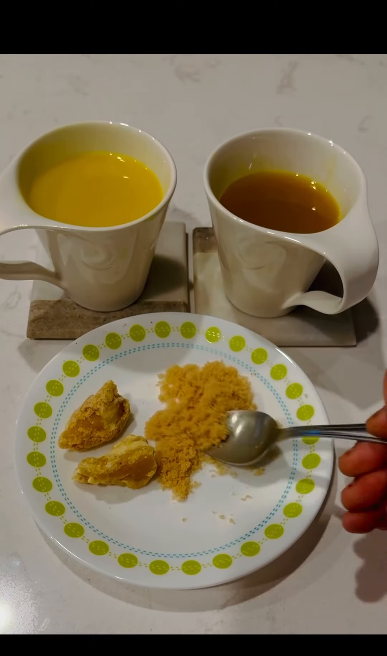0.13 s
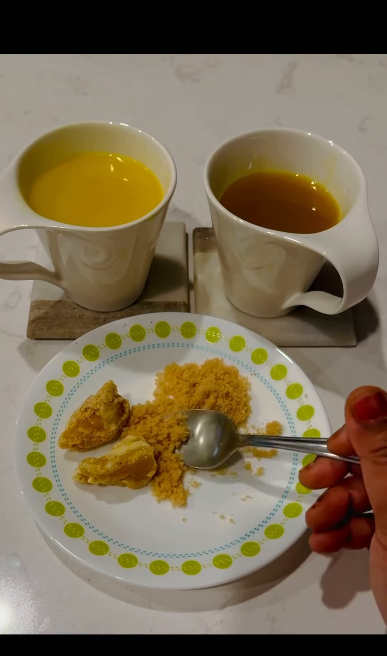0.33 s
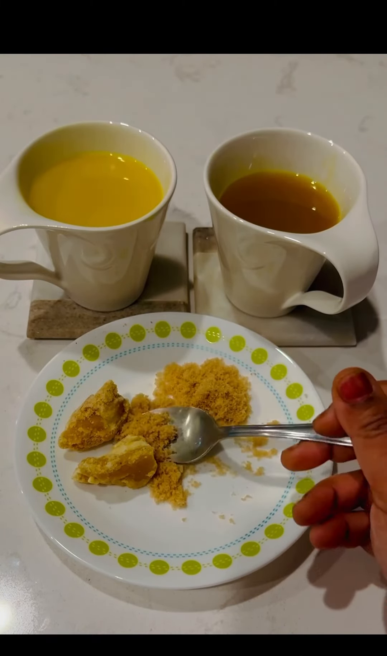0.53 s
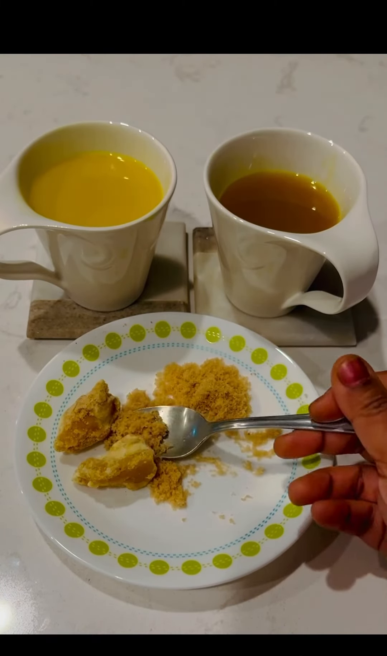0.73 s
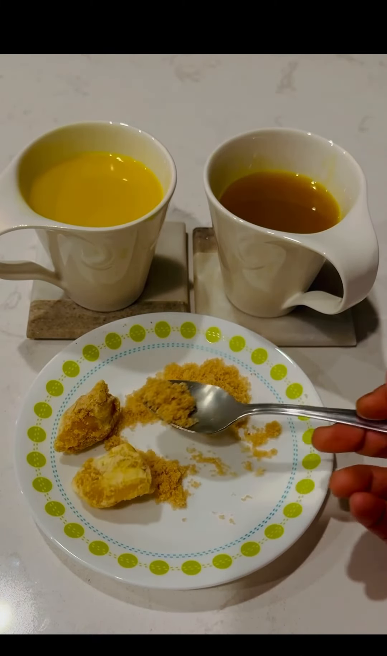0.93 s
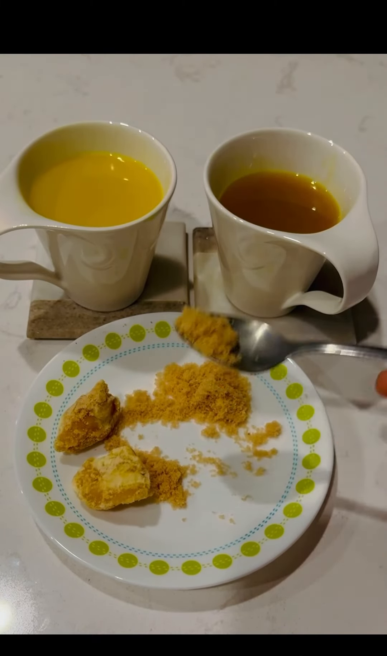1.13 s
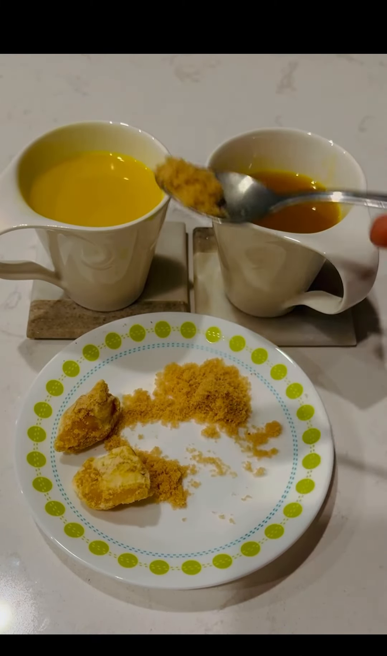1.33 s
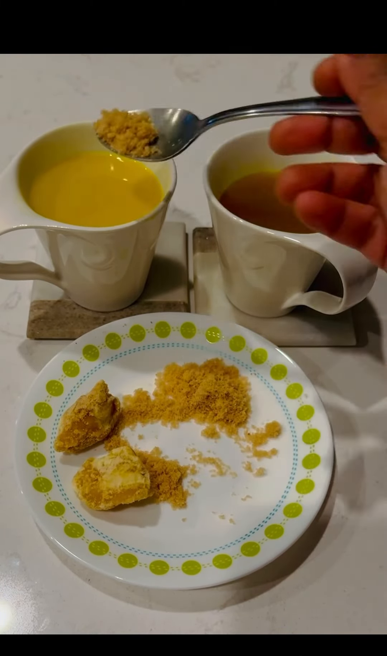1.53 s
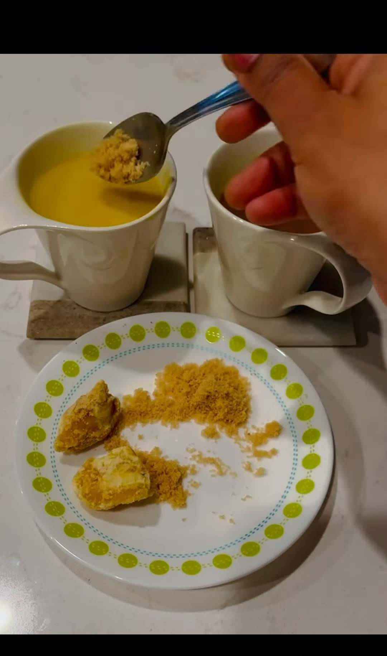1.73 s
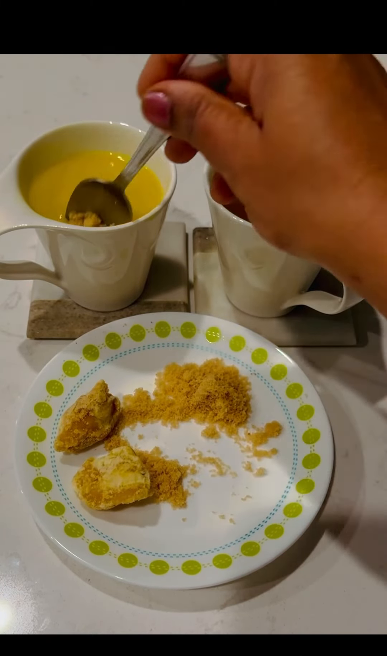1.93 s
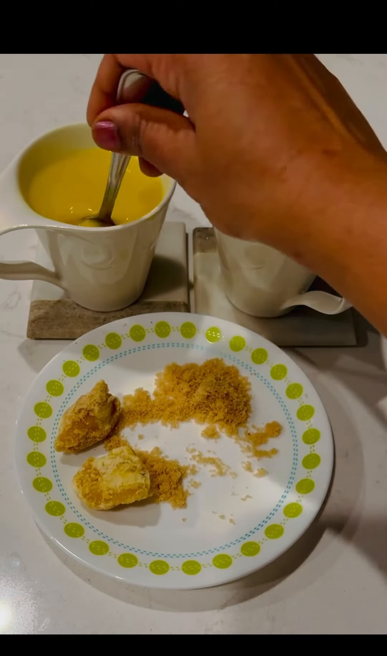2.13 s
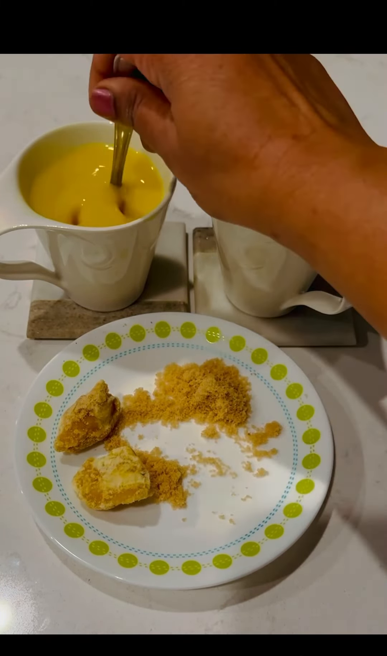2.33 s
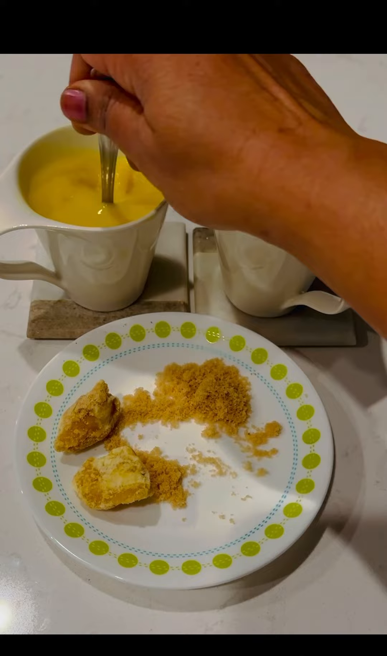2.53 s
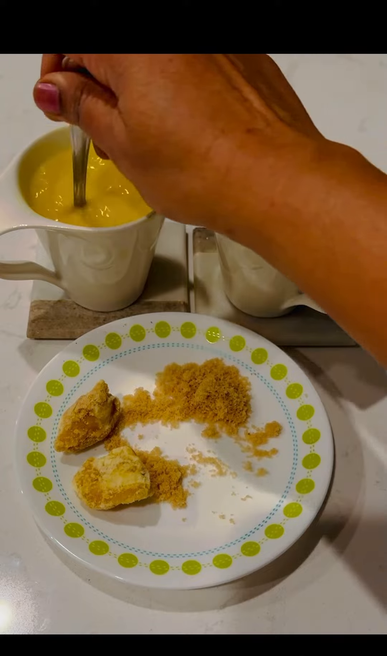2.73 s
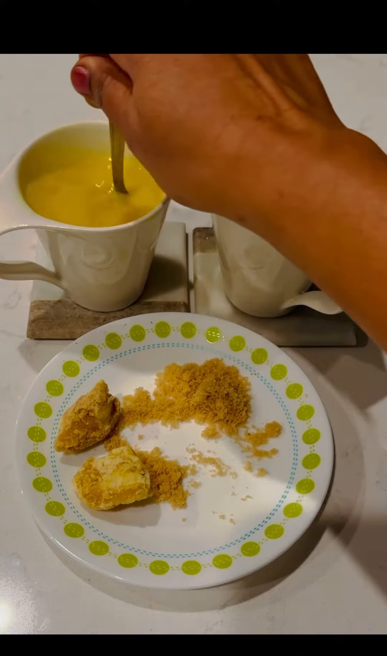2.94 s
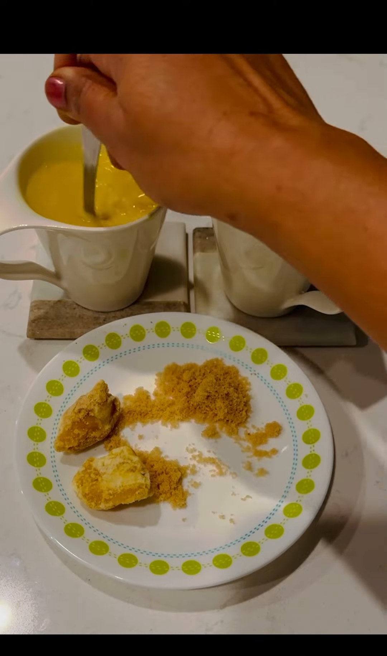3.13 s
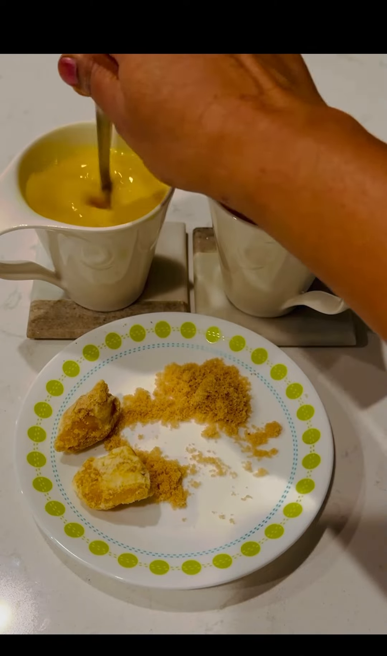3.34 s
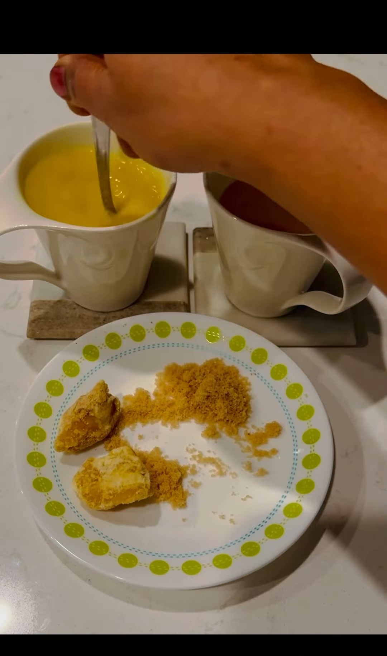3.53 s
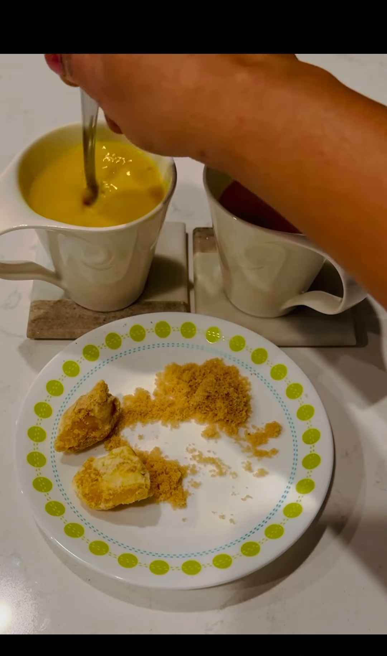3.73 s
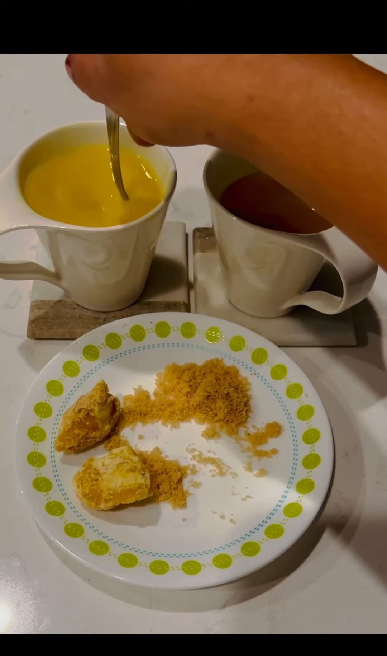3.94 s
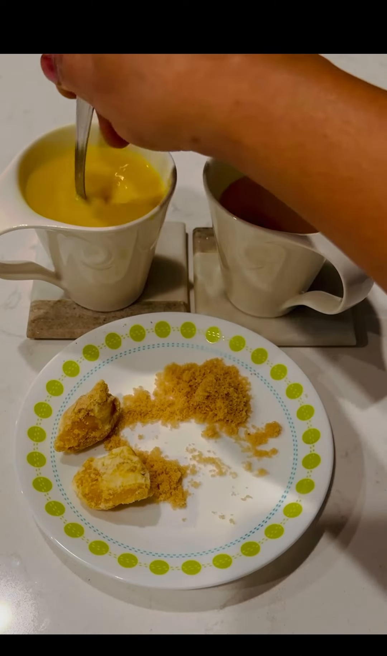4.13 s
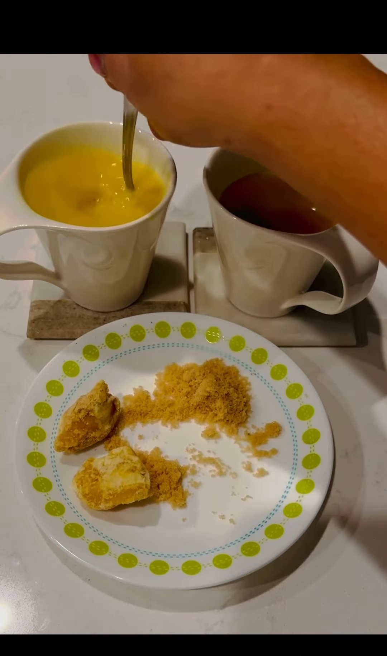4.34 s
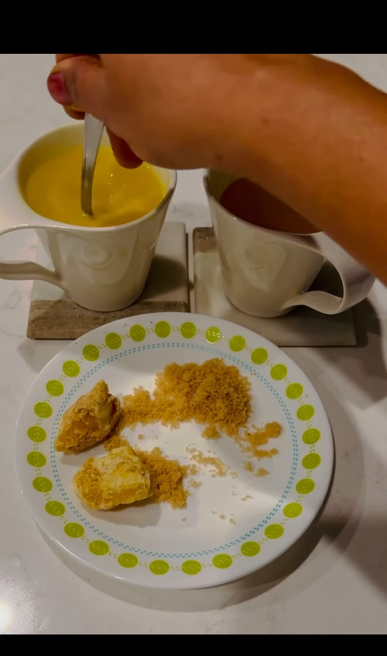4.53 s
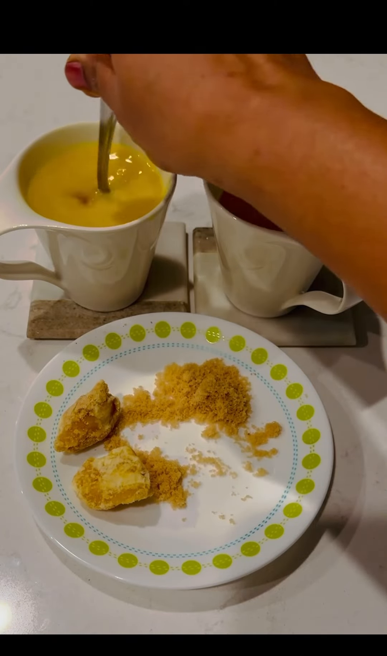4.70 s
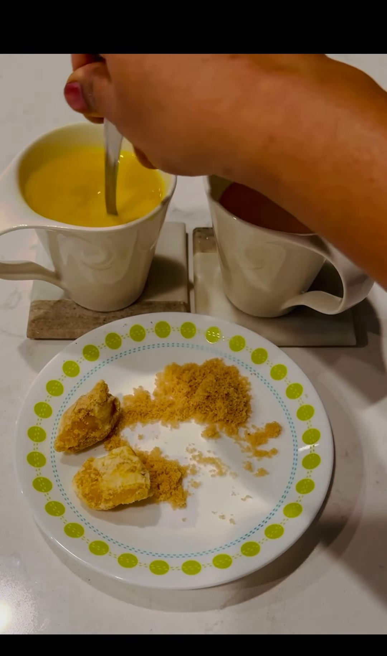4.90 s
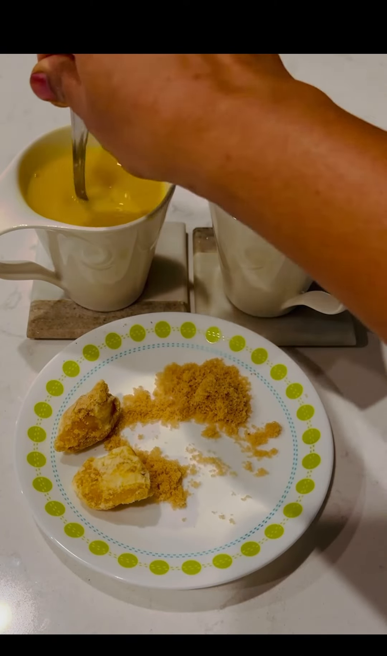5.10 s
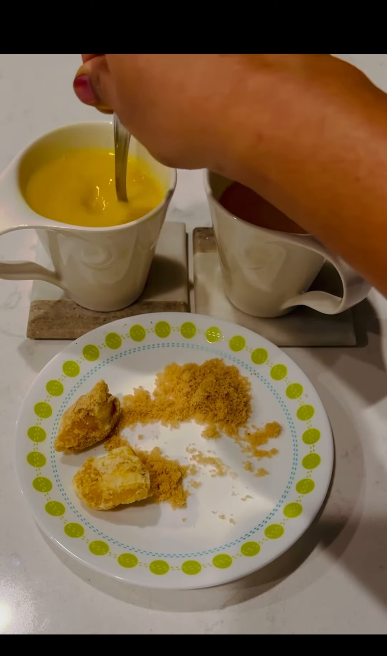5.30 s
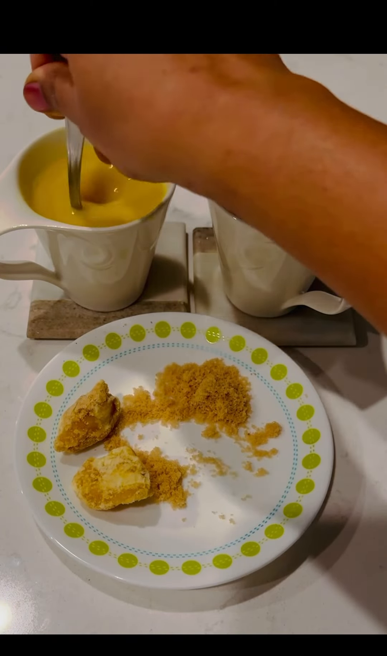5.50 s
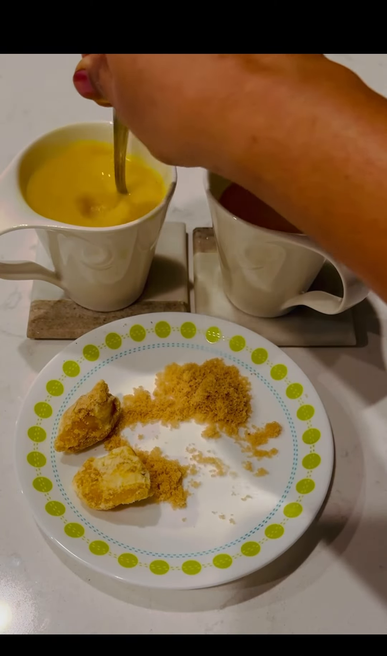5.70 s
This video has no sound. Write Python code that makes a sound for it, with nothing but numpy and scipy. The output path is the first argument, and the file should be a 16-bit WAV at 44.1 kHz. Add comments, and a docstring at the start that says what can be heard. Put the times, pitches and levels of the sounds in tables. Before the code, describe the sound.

Gritty spoon scraping and light taps on a plate, a near-silent gap, then bright, damped clinking and gurgling stirring in a full mug.

```python
"""A quiet kitchen: a steel spoon scrapes sugar crumbs off a plate, then stirs a full ceramic mug, knocking its wall.
Each knock is noise through resonances plus sine modes that ring on, drift and waver as the drink moves.
Swishes and crunches are random clicks through resonances; short damped sines blip in the stirred drink.
Hard walls answer with dying noise; appliance rumble and faint hiss lie underneath.
A phone hears it all through two ports, which differ in balance and phase."""
import sys
import numpy as np
from scipy import signal
from scipy.fft import rfft, irfft, next_fast_len
from scipy.io import wavfile
from scipy.ndimage import uniform_filter1d

SR = 44100
rng = np.random.default_rng(int(sys.argv[2]) if len(sys.argv) > 2 else 0)


def output_pcm(signal):
    """Save a mono or channel-first signal as 16-bit PCM at the path in sys.argv[1].

    Samples are clipped to [-1, 1] before scaling.
    """
    pcm = np.clip(np.atleast_2d(signal).T, -1, 1) * 32767
    wavfile.write(sys.argv[1], SR, np.round(pcm).astype(np.int16))


N = 254016

# mug modes, in groups that share a shape round the wall:
# (nominal pitch at the first clink [Hz], once the sugar has mixed in [Hz], relative level [dB], free t60 [s])
MUG_MODES = [
    [(1813, 1790, 1, 0.31)],
    [(1937, 1875, 1, 0.33)],
    [(4440, 4400, 0, 0.23)],
    [(5530, 5435, -3, 0.17)],
    [(5500, 5110, 2, 0.19)],
    [(8300, 8160, -10, 0.34), (8160, 8390, -14, 0.1)],
    [(9280, 9240, -4.5, 0.14), (9600, 11000, -13, 0.093)],
]
# steel on glaze: (centre [Hz], width [Hz], relative level [dB])
GLAZE_TICK = [(4345, 580, -4), (5500, 740, -1.5), (6550, 900, 0), (8090, 400, 4.5), (9230, 700, -0.5),
              (9970, 615, -1.5), (12050, 540, -8), (14650, 800, -9)]
# an edge-on knock: (centre [Hz], width [Hz], relative level [dB])
EDGE_KNOCK = [(2065, 258, 2), (2726, 196, -4), (3090, 278, -5)]


def mug():
    """Each contact damps the old ring and starts a new one; the pitches drift as the sugar mixes in."""
    # spoon meets mug: (time [s], knock [dB], tick [dB], brightness of the knock [0-1], ring [dB],
    # hardness [dB per octave], place on the wall [degrees], spoon ring [dB],
    # share of the free ring time left to the upper modes [ratio], share of the higher mode near 5 kHz [0-1])
    clinks = [(1.983, -45, -31.5, 0.32, -43.5, -20.5, 136, -86, 3.2, .5),
              (2.2597, -61, -46, 0.6, -68, -6, 96, -74, .95, .5),
              (2.266, -41.5, -35, 0.96, -45, -8, 96, -86, 0.82, 0.4),
              (2.278, -44.5, -39, 0.88, -50, -8, 115, -80, 1.7, 0.1),
              (2.5142, -51.5, -59.5, 0.97, -84, -8, 180, -90, .95, .5),
              (2.639, -47, -38, 0.75, -46.5, -7.5, 59, -35, 0.46, .2),
              (2.676, -47, -56, 0.78, -52, -6.5, 152, -58, 1.2, 0.6),
              (2.8178, -55, -54.5, 0.97, -66, 2, 150, -70, 0.2, 0.3),
              (2.861, -43, -39.5, 1, -54.5, -14, 100, -52, .78, 0.6),
              (2.8983, -43, -47.5, 0.92, -56, -9, 110, -52, 0.36, .5),
              (3.1294, -40.5, -28.5, 0.82, -47, -5, 78, -90, .61, 1),
              (3.139, -42, -71, 0.9, -46, -10, 15, -95, 1.2, 0.8),
              (3.202, -51, -69, 0.86, -52.5, -9, 83, -82, 1.3, 0.9),
              (3.3405, -43, -32.5, 0.91, -48.5, -2, 93, -40, 0.81, 1),
              (3.5621, -36.5, -40.5, 0.76, -64.5, 5, 57, -86, 0.58, 0.3),
              (3.634, -45.5, -43, 0.76, -64.5, 5, 57, -82, 0.55, 0.86),
              (3.794, -36, -28.5, 0.86, -45.5, 0, 160.5, -44.5, 0.75, 1),
              (3.8353, -46.5, -67, 0.7, -60.5, -1, 127, -77, 0.85, .7),
              (4.0185, -53, -49, 0.2, -63, -8, 63, -81, .94, 0.6),
              (4.0755, -60, -51, 0.9, -64, -10, 52, -60.5, 0.87, .5),
              (4.1025, -64, -52, 0.8, -63, -7, 94, -73, 2.3, 0.2),
              (4.1376, -46, -48, 0.96, -50, -11, 95, -63, 1.4, 0.75),
              (4.2039, -47, -48, 0.74, -67.5, 2, 57, -62.5, .72, 1),
              (4.279, -33.5, -25, 0.69, -42, -2.5, 22, -43, 1.06, 0),
              (4.343, -40.5, -47, 0.54, -52, -8, 42, -54, 2.2, 1),
              (4.4545, -39, -38, 0.84, -55.5, -4.5, 57, -45.5, 1.26, .25),
              (4.54, -48.5, -66, 0.9, -56, -7, 3.7, -62.5, 1.7, .9),
              (4.5932, -47.5, -48, 1, -47.5, -7.5, 157, -51, 0.84, 0.43),
              (4.822, -49, -53, 0.48, -53, -12.5, 2.3, -57.5, .66, 0),
              (4.91, -43, -75, 0.87, -51.5, -13, 112, -59.5, 2.1, 0.5),
              (4.982, -43, -42.5, 0.7, -60, 2, 58, -51.5, 0.95, 1),
              (5.0281, -52, -50, 0.93, -57.5, -4.5, 63.5, -90, 0.64, .8),
              (5.2323, -34, -27.5, 0.66, -46.5, -1, 29, -36, 0.88, 1),
              (5.304, -39, -44, 0.86, -59, -1.5, 94, -54, 1, 0.9),
              (5.359, -46.5, -57, 0.95, -53.5, -3, 150, -61, 1.8, 0.9),
              (5.395, -48, -64, 0.9, -72, -1, 160, -79, 1.2, .5),
              (5.441, -53, -55, 1, -62.5, -7, 75, -61.5, 2.5, .5),
              (5.492, -45.5, -42, 0.85, -65, 3.5, 56, -55, 0.69, 0.4),
              (5.514, -54, -47, 0.9, -64, -1, 58, -81, 1, 0.3),
              (5.683, -42, -37.5, 0.28, -50, -8, 26, -54, 0.78, 0.6),
              (5.687, -50, -46, 0.4, -41, -13, 83.5, -54, 1.8, 1)]
    # spoon ringing in the drink: columns as for the mug modes
    spoon_modes = [(6690, 6760, 5, 0.09), (5900, 3000, -5, 0.04)]
    # a flat knock through the drink: (centre [Hz], width [Hz], relative level [dB])
    flat_knock = [(699.5, 132, -5), (1152, 210, 6), (1714, 686, -0.5)]
    twin_fades_s, twin_late_t60 = 3.3, 0.14  # from this time on the upper of the two lowest modes dies fast [s, s]
    wash_db, wash_t60 = -20, .16  # many small modes blur into a hiss after each tick [dB re tick, s]

    hits, t = np.array(clinks), np.arange(N) / SR
    times, knock_db, tick_db, brightness, ring_db, hardness, place, spoon_db, upper_share, higher = hits.T
    last = np.searchsorted(times, t) - 1  # latest contact; -1 before the first
    since = abs(t - times[last])
    unmixed = np.exp(-np.clip(t - times[0], 0, None) / 1.1)
    first_flash = 1 + 0.98 * amp(-60 * since / 0.059)  # loud until the spoon and the drink take up the blow

    ring = np.zeros(N)
    levels = ring_levels(ring_db, hardness, place, higher) + [spoon_db]
    for group, group_db in zip(MUG_MODES + [spoon_modes], levels):
        for start_hz, end_hz, db, t60 in group:
            height = end_hz / 4400
            level_luck, pitch_luck = rng.standard_normal((2, len(hits)))
            lasts = t60 * (np.clip(upper_share, .2, 2) if end_hz > 3000 else np.ones(len(hits)))
            if group is MUG_MODES[1]:
                lasts = np.where(times < twin_fades_s, t60, twin_late_t60)
            struck = carried(times, amp(group_db + db + 0.9 * height * level_luck), lasts)
            decay = amp(-60 * since / lasts[last])
            size = struck[last] * decay * first_flash ** min(height, 1.5) * (last >= 0)
            # the spoon lands on a new spot and the drink sloshes: each ring is a little out of tune
            detune = 1 + 0.0023 * pitch_luck[last] + 0.0022 * height ** 2.3 * wobble(60)
            hz = (end_hz + (start_hz - end_hz) * unmixed) * detune
            onset = np.pad(uniform_filter1d(size, size=61), (30, 0))[:N]  # softened and slightly late
            # the higher the mode, the more the moving drink breaks up its ring
            breakup = amp(2.3 * height ** .9 * wobble(80))
            ring += onset * breakup * np.sin(2 * np.pi * np.cumsum(hz) / SR)

    knocks = split_blows(times, knock_db, brightness, 0.039, flat_knock, EDGE_KNOCK)
    touches = bursts(times, tick_db, 0.018)
    wash = bursts(times, tick_db + wash_db, wash_t60)
    return ring + knocks + body(touches + wash, GLAZE_TICK, steep=True)


def ring_levels(ring_db, hardness, place, higher):
    """Per blow and group of modes: force, a tilt for hardness, and how far the wall moves at the place struck."""
    # shape of each group round the wall: (waves [count], loudest place [degrees], level added there [dB])
    wall_shapes = [(2, 0, 7.5), (2, 45, 7.5), (3, 5.3, 16.8), (3, -16.2, 10.1), (3, -16.2, 10.1),
                   (4, -10.6, 24.4), (2, 13.8, 17.8)]
    node_leak = 0.019  # amplitude that a blow on a still line wakes

    lowest_hz = MUG_MODES[0][0][1]
    higher = np.clip(higher, .02, .98)
    pair_share = {3: higher, 4: 1 - higher}  # the two modes near 5 kHz split one blow's power
    levels = []
    for k, (group, (waves, loudest, db)) in enumerate(zip(MUG_MODES, wall_shapes)):
        tilt_db = hardness * np.log2(group[0][1] / lowest_hz)
        motion = abs(np.cos(waves * np.radians(place - loudest))) + node_leak
        share_db = 10 * np.log10(pair_share.get(k, 1))
        levels.append(ring_db + db + share_db + tilt_db + 20 * np.log10(motion))
    return levels


def carried(times, fresh, lasts):
    """Size of a mode after each contact: the new blow and what is left of the ring before."""
    carry = 0.47  # share of the old ring that survives a new contact
    size = list(fresh[:1])
    for gap, new, t60 in zip(np.diff(times), fresh[1:], lasts):
        size.append(np.hypot(new, carry * size[-1] * amp(-60 * gap / t60)))
    return np.array(size)


def blips():
    """Each pitched blip of the stirred drink is a damped sine with a soft start and a ragged level."""
    # (start [s], starting pitch [Hz], nominal level [dB], life [cycles]); the envelope peaks at half the life
    drink_blips = [(2.266, 2780, -49, 68), (2.375, 710, -64.5, 7.6), (2.516, 2330, -40, 7),
                   (2.865, 2640, -51, 25), (2.764, 3780, -49.5, 10), (2.975, 1396, -57, 15),
                   (3.345, 2616, -42, 18), (3.48, 704, -65, 7.6), (3.505, 688, -63, 7.5),
                   (3.833, 2155, -42.5, 12)]
    sag_per_s = 1.1  # the pitch sinks by this share a second
    out, t = np.zeros(N + SR), np.arange(SR // 10) / SR
    for s, hz, db, life in drink_blips:
        u = t * hz / life * 2
        envelope = np.e * u * np.exp(-u)
        out[round(s * SR):][:len(t)] += amp(db) * envelope * np.sin(2 * np.pi * hz * t * (1 - sag_per_s * t / 2))
    return out[:N] * amp(3.4 * wobble(300))


def swirl():
    """The spoon drags drink and sugar along the glaze in uneven, gurgling swishes."""
    # spoon dragging through the drink: (time [s], swish gain [dB], share made near the surface [0-1])
    drag = [(1.95, -79, 0.8), (2.6, -76.5, 0.06), (2.75, -63, 0.74), (2.84, -70, 0.8), (3, -62.5, 0.4),
            (3.11, -74, 0.1), (3.25, -60, 1), (3.45, -59.5, 0.2), (3.53, -67.5, 0.5), (3.59, -56, 0.6),
            (3.75, -63, 0.6), (3.88, -72, 0.6), (3.97, -55.5, 0.73), (4.07, -73, 0.73), (4.4, -60, 0.3),
            (4.7, -76, 0.02), (4.78, -70.5, 0.76), (4.93, -56, 0.5), (5.18, -72, 0.03), (5.27, -60.5, 0.04),
            (5.42, -62, 0), (5.62, -73, 0.17), (5.76, -54, 1)]
    # air above the drink, for deep and surface strokes: (centre [Hz], width [Hz], relative level [dB])
    deep_air = [(694, 670, -11.5), (1490, 380, 2)]
    shallow_air = [(2125, 430, -4), (3420, 400, -9.5)]

    def rub():
        return unit(grit(2500, 2.8) * amp(4.5 * wobble(35)))

    def hollow(peaks):
        return patchy(body(body(rub(), peaks), peaks), 7.5)  # the narrow mouth filters steeply

    s, _, share = np.transpose(drag)
    share = np.clip(np.interp(np.arange(N) / SR, s, share), 0, 1)
    shallow = hollow(shallow_air) + amp(-16.0) * hollow(EDGE_KNOCK[:1])
    shallow = shallow + amp(-9.0) * body(rub(), GLAZE_TICK) + amp(-10.5) * bubbles(count=400)
    # the rubbing keeps the lowest mode of the mug singing, 47 Hz wide
    song = unit(body(rub(), [(MUG_MODES[0][0][1], 47, 0)]))
    return curve(drag) * (np.sqrt(1 - share) * hollow(deep_air) + np.sqrt(share) * shallow + song)


def bubbles(count):
    """Tiny air pockets: very short sines with a soft start and a slightly rising pitch, rms 1."""
    start, pitch, size = rng.random((count, 3)).T
    t = np.arange(SR // 60) / SR
    hz = (1300 * 2.8 ** (pitch * pitch))[:, None]
    envelope = t * hz * np.exp(-t * hz / 3.5)
    pockets = amp(12 * size)[:, None] * np.sin(2 * np.pi * hz * t * (1 + 3 * t)) * envelope
    where = (start[:, None] * N).astype(int) + np.arange(len(t))
    return unit(np.bincount(where.ravel(), pockets.ravel(), minlength=N)[:N])


def plate():
    """Taps and crushed crumbs ring the plate low and the spoon high, and press on the counter."""
    # spoon on the plate: (time [s], low level [dB], high level [dB], nearness to the rim [0-1])
    plate_taps = [(0.032, -43.5, -39, 0.3), (0.053, -40, -47, 0.89), (0.058, -53, -56, 0.9),
                  (0.102, -61, -45, 0.9), (0.2365, -52.5, -61.5, 1), (0.259, -44.5, -52.5, 0.35),
                  (0.2758, -41.5, -55, 0.35), (0.2826, -48, -53, 0.5), (0.3165, -46, -65, 0.13),
                  (0.42, -54.5, -79, 0.03), (0.4708, -51.5, -46.5, 1), (0.512, -76, -59.5, 0.9),
                  (0.7087, -69.5, -71, 0.3), (0.9592, -63.5, -58, 0.22), (0.997, -71, -68, 0.15),
                  (1.0245, -68.5, -69, 0.3), (1.64, -78, -69, 0.1)]
    # resonances, all (centre [Hz], width [Hz], relative level [dB]):
    # middle of the plate, its rim, the spoon, the stone top under the plate
    plate_middle = [(2230, 420, 4.5), (2545, 180, -0.5)]
    plate_rim = [(2760, 240, 2), (3970, 165, 0.5), (4440, 224, -4), (5900, 360, -9.5)]
    spoon_steel = [(6220, 230, -6.5), (7070, 350, 2.5), (8580, 190, -0.5), (9870, 480, -1),
                   (13200, 530, -8), (14400, 1100, -15)]
    stone_top = [(593, 51, 7), (1270, 460, 1)]

    def crunch(clump_db):
        return unit(grit(2500, 2.55) * amp(clump_db * wobble(90.2)))

    s, low_db, high_db, rim = np.transpose(plate_taps)
    taps = split_blows(s, low_db, rim, 0.014, plate_middle, plate_rim)
    taps = taps + body(bursts(s, high_db, 0.023), spoon_steel)
    grains = crunch(clump_db=2.0)
    on_plate = body(grains, plate_middle, steep=True) + amp(-5.0) * body(grains, plate_rim, steep=True)
    crumbs = patchy(on_plate, 1.5) + amp(-10.0) * body(crunch(clump_db=-5.0), spoon_steel)
    return taps + pushes(column=1) * crumbs + pushes(column=2) * body(crunch(clump_db=4.0), stone_top)


def pushes(column):
    """Gain that swells to each push of the spoon into the crumbs and fades after it."""
    # (hardest moment [s], crunch gain [dB], press on the counter [dB])
    crumb_pushes = np.array([(.005, -61, -93), (.1, -60, -86), (.17, -65, -98), (.25, -59, -98),
                             (.3, -61, -70), (0.339, -62, -79), (0.431, -62.5, -76.5), (0.458, -59, -80),
                             (0.55, -55, -67.5), (0.574, -59.5, -68.5), (.65, -76, -80)])
    swell_db_per_s, fade_db_per_s = 362, 316
    late = np.arange(N) / SR - crumb_pushes[:, :1]
    slope_db = np.minimum(swell_db_per_s * late, -fade_db_per_s * late)
    return amp(crumb_pushes[:, column, None] + slope_db).sum(0)


def room(x):
    """Each frequency of the walls' answer dies at its own speed; each stretch of sound meets a fresh tail."""
    # decay of the walls' answer: (frequency [Hz], t60 [s])
    wall_decay = [(500, 0.69), (2000, 0.56), (6000, 0.57), (10000, 0.4), (15000, 0.12)]
    out, step = np.zeros((2, N + SR)), SR // 4
    for k in range(0, N, step):
        hz, t, z = signal.stft(rng.standard_normal((2, SR // 2)), SR, nperseg=256)
        fading = z * amp(-60 * t / along(wall_decay, hz)[:, None])
        tail = signal.istft(fading, SR, nperseg=256)[1]
        tail = tail + 0.91 * tail.mean(0)  # part of the tail reaches both ports alike
        wet = signal.fftconvolve(x[None, k:k + step], tail / np.linalg.norm(tail[0]), axes=1)
        out[:, k + 200:k + 200 + wet.shape[1]] += wet  # 200 samples behind the direct sound
    return out[:, :N]


def kitchen():
    """Low appliance rumble that wanders in lumps, over a faint hiss."""
    # slow course of the rumble: (time [s], relative level [dB])
    hum_course = [(0, -68.5), (1.3, -72.5), (2.2, -69.5), (3.2, -67.5), (4.3, -67.5), (5.76, -68)]
    # spectrum of the appliance rumble: (frequency [Hz], relative level [dB per Hz])
    rumble_spectrum = [(22, -28), (64, -1.5), (139, -6), (181, -6.5), (331, -14), (411, -18), (565, -20.5),
                       (635, -27.5), (1200, -32), (1900, -90)]
    # spectrum of the hiss: (frequency [Hz], relative level [dB per Hz])
    hiss_spectrum = [(500, -31), (1000, 0), (2200, 0), (3500, -6), (6500, -4.5), (7600, -11.5), (9000, -9),
                     (11300, -20), (14000, -6), (16500, -28)]
    lumps = amp(3.0 + 1.4 * wobble(4.73) + 1.7 * wobble(18))
    return curve(hum_course) * lumps * rush(rumble_spectrum) + amp(-84.5) * rush(hiss_spectrum)


def rush(spectrum):
    """Stereo noise of rms 1, its mid and side weighted for a set left-right likeness at each frequency."""
    # likeness of the two ports: (frequency [Hz], left-right correlation [-1 to 1])
    likeness = [(60, 0.94), (150, 0.96), (380, 0.79), (950, -0.18), (2380, 0.68), (5980, 0.48),
                (15000, -0.39)]

    def response(hz):
        turn = np.arccos(np.clip(along(likeness, hz), -1, 1)) / 2
        return amp(along(spectrum, hz)) * np.array([np.cos(turn), np.sin(turn)])

    mid, side = filtered(rng.standard_normal((2, N)), response)
    return unit(np.array([mid + side, mid - side]))


def split_blows(times, levels_db, share, t60, first, second):
    """Blows whose power is split between two sets of resonances."""
    share = np.clip(share, .02, .98)
    first_blows = bursts(times, levels_db + 10 * np.log10(1 - share), t60)
    second_blows = bursts(times, levels_db + 10 * np.log10(share), t60)
    return body(first_blows, first, steep=True) + body(second_blows, second, steep=True)


def bursts(times, levels_db, t60):
    """Short dying puffs of noise: the rough first touch of two hard things; light touches start more softly."""
    out, t = np.zeros(N + SR), np.arange(SR // 6) / SR
    for s, db in zip(times, levels_db):
        rise = np.clip(0.00014 * amp(-.6 * (db + 34.0)), .0002, .001)
        puff = rng.standard_normal(len(t)) * amp(-60 * t / t60) * (1 - np.exp(-t / rise))
        start_rms = np.sqrt(np.mean(puff[:SR // 200] ** 2))  # over the first 5 ms
        out[round(s * SR):][:len(t)] += amp(db) * puff / start_rms
    return out[:N]


def grit(rate, spread_db):
    """Sparse random clicks of very uneven size, rms 1."""
    present = rng.random(N) < rate / SR
    return unit(present * amp(spread_db * rng.exponential(size=N)) * rng.standard_normal(N))


def patchy(x, depth_db):
    """Random patches of gain over pitch and time, as the resonances shift about; rms 1."""
    z = signal.stft(x, nperseg=256)[2]
    across_pitch = uniform_filter1d(rng.standard_normal(z.shape), size=2, axis=0)
    field = uniform_filter1d(across_pitch, size=12, axis=1)
    return unit(signal.istft(z * amp(depth_db * unit(field)), nperseg=256)[1][:N])


def body(x, peaks, steep=False):
    """x through causal resonances, with unit mean power gain for white noise; steep ones leave dark valleys."""
    order = 1 + steep
    widen = 1 / np.sqrt(2 ** (1 / order) - 1)  # keeps the width when the response is squared

    def response(f):
        total = 0
        for k, (centre, width, db) in enumerate(peaks):
            damping = 1j * f * width * widen
            total = total + (-1) ** k * amp(db / order) * damping / (centre * centre - f * f + damping)
        return unit_gain(total ** order)

    return filtered(x, response)


def unit_gain(response):
    """A complex response scaled to mean power 1."""
    return response / np.sqrt(np.mean(abs(response) ** 2))


def filtered(x, response):
    """x times a complex response of frequency."""
    m = next_fast_len(N + SR // 5)
    return irfft(rfft(x, m) * response(np.fft.rfftfreq(m, 1 / SR)), m)[..., :N]


def amp(db):
    """dB to gain."""
    return 10 ** (np.asarray(db) / 20)


def unit(x):
    """Scaled to rms 1."""
    return x / np.sqrt(np.mean(x ** 2) + 1e-20)


def along(points, hz):
    """(Hz, value) points interpolated on a log frequency axis."""
    f, v = np.transpose(points)
    return np.interp(np.log(hz + 1), np.log(f + 1), v)


def curve(rows, column=1):
    """Gain per sample from a dB column of (time, dB, ..) rows, at -140 dB outside them."""
    table = np.transpose(rows)
    return amp(np.interp(np.arange(N) / SR, table[0], table[column], left=-140, right=-140))


def wobble(rate):
    """A random curve: normal knots, rate a second, joined by straight lines."""
    knots = rng.standard_normal(int(N * rate / SR) + 2)
    return np.interp(np.arange(N) * rate / SR, np.arange(len(knots)), knots)


def scene():
    """Near sounds reach the two ports with their own lead and balance, over the walls' answer and the kitchen."""
    # phase of the ports: (frequency [Hz], left port's lead [radians])
    port_lead = [(500, -0.014), (1000, 1.95), (2000, 0.83), (7000, 0.8), (8100, 1.57), (9300, -1.58),
                 (12000, -1.63)]
    # balance of the ports: (frequency [Hz], left minus right [dB])
    port_lean = [(300, -38), (700, -1), (1290, -2.5), (1790, -4.5), (2380, 1.5), (4400, 3), (8120, 2),
                 (15000, -0.5)]
    # notches of the phone case: (frequency [Hz], gain [dB])
    case_notches = [(300, -2), (6800, -4.5), (7500, -15.5), (8100, -8.5), (10500, -6.5), (11300, -20.5),
                    (12300, -4.5)]

    def ports(hz):
        half = amp(along(port_lean, hz) / 2) * np.exp(.5j * along(port_lead, hz))
        return np.array([half, 1 / half])

    near = mug() + blips() + swirl() + plate()
    heard = filtered(near, ports) + amp(-12.5) * room(near)
    return filtered(heard, lambda hz: amp(along(case_notches, hz))) + kitchen()


def record(dry):
    """The phone keeps nothing above its band limit."""
    top_hz = 16800
    return filtered(dry, lambda hz: hz < top_hz)


dry = scene()
out = record(dry)
output_pcm(out)
```